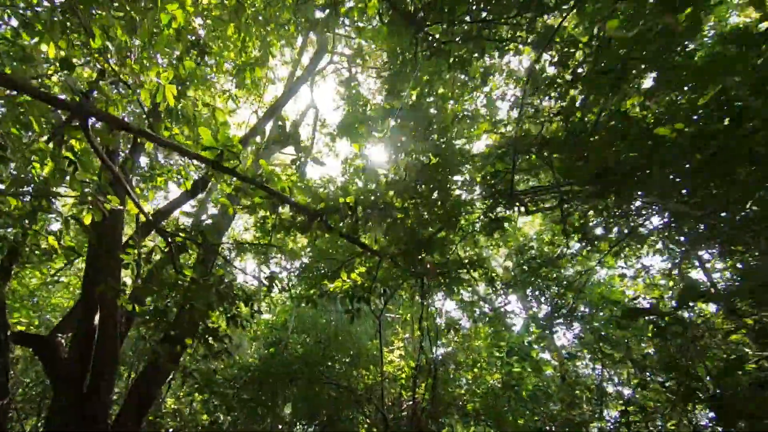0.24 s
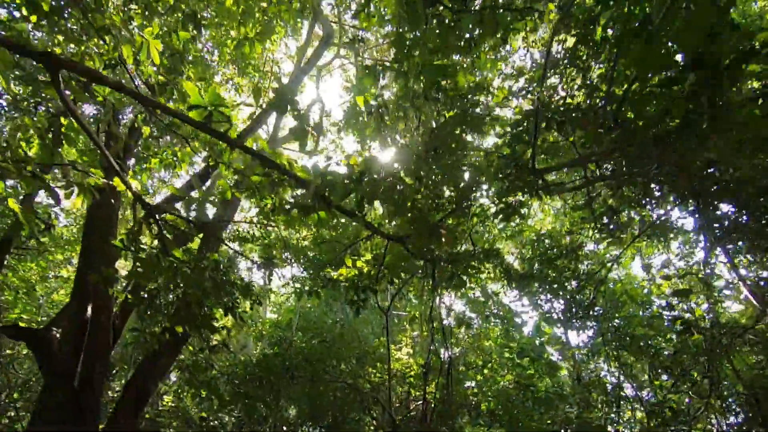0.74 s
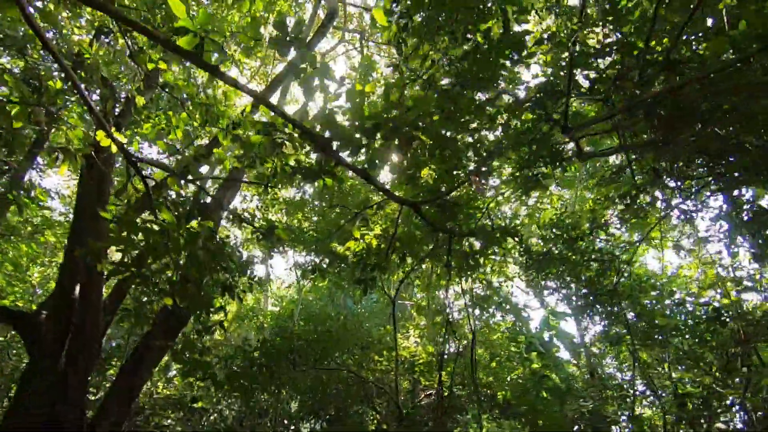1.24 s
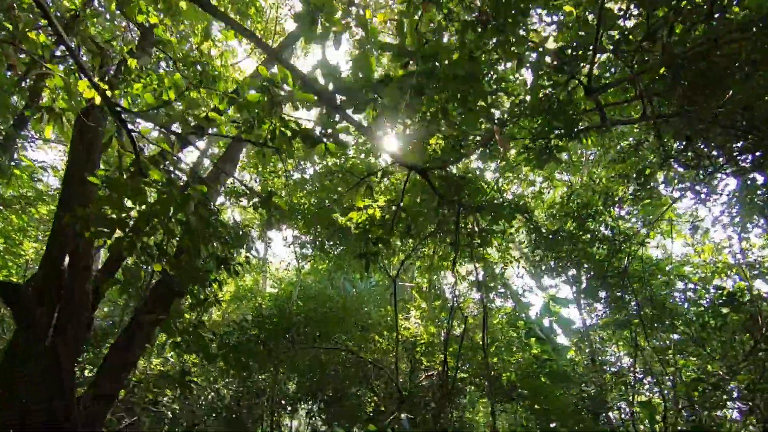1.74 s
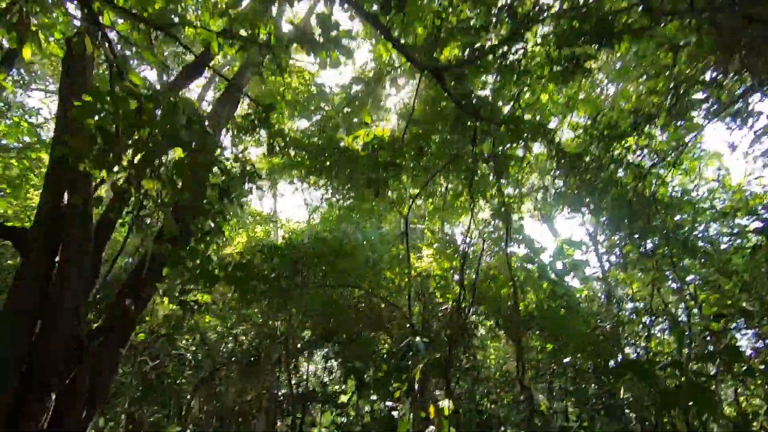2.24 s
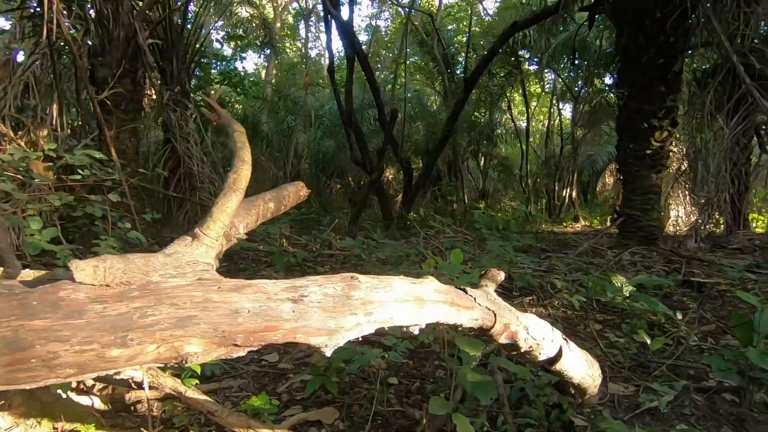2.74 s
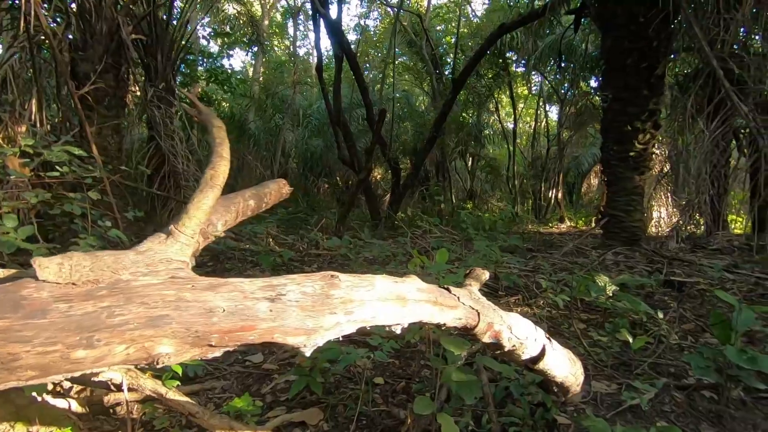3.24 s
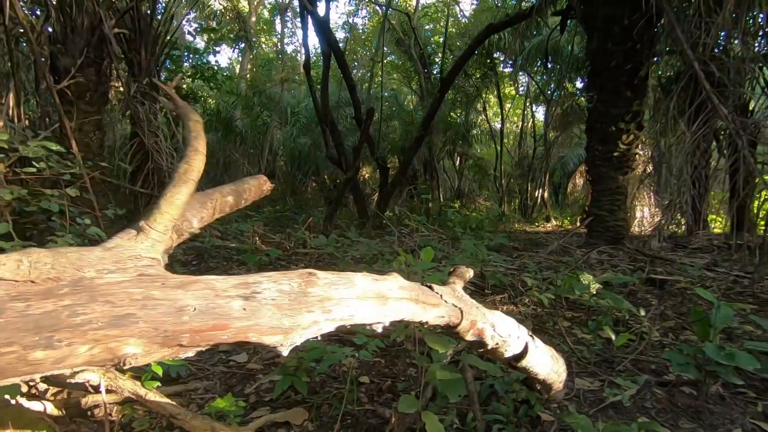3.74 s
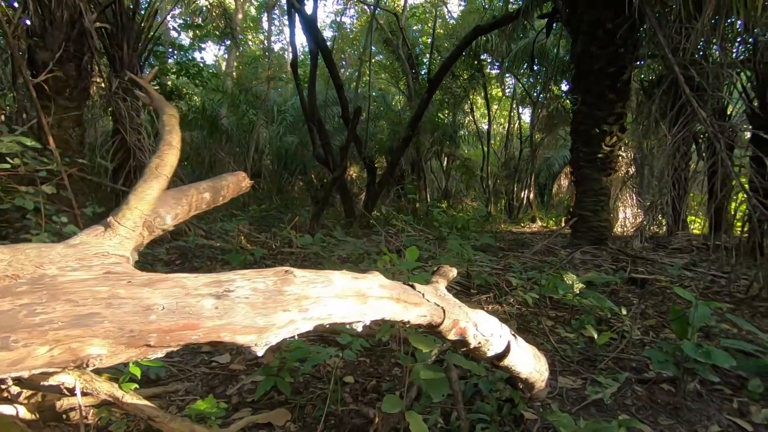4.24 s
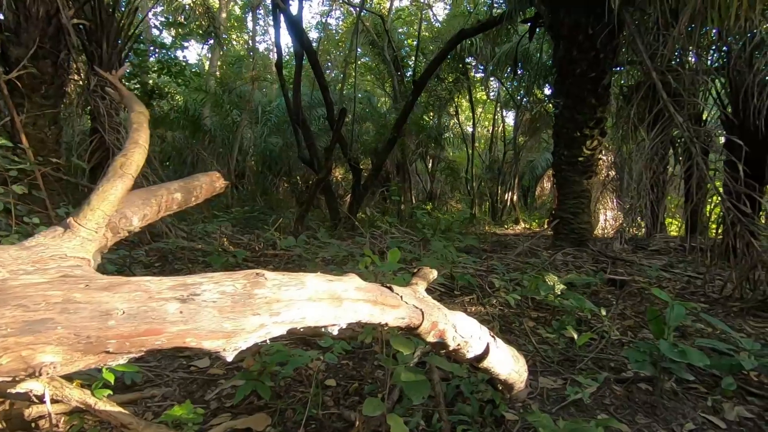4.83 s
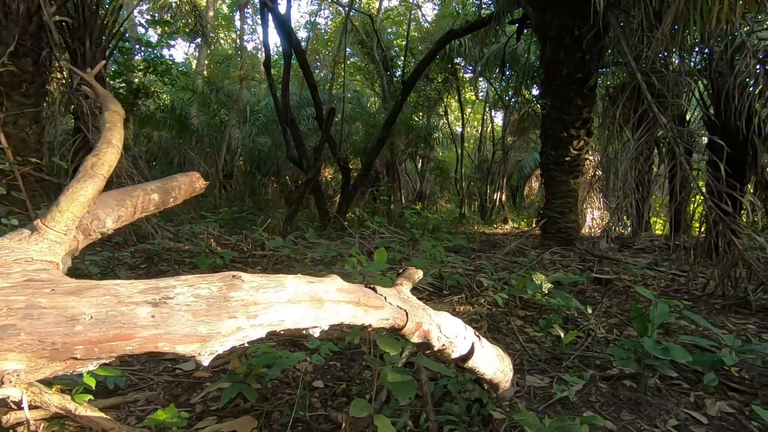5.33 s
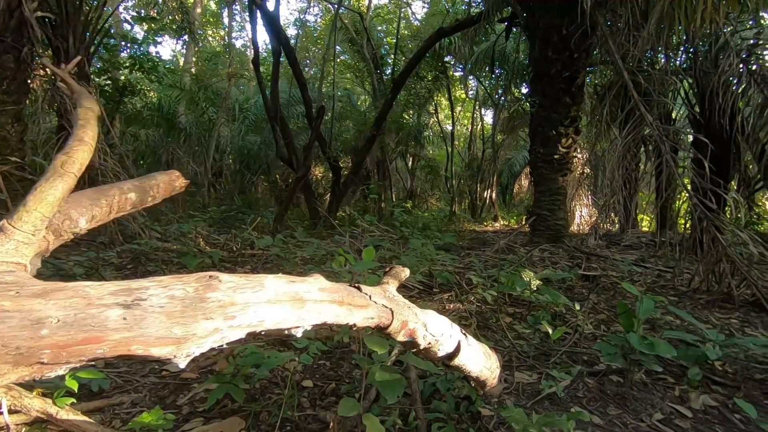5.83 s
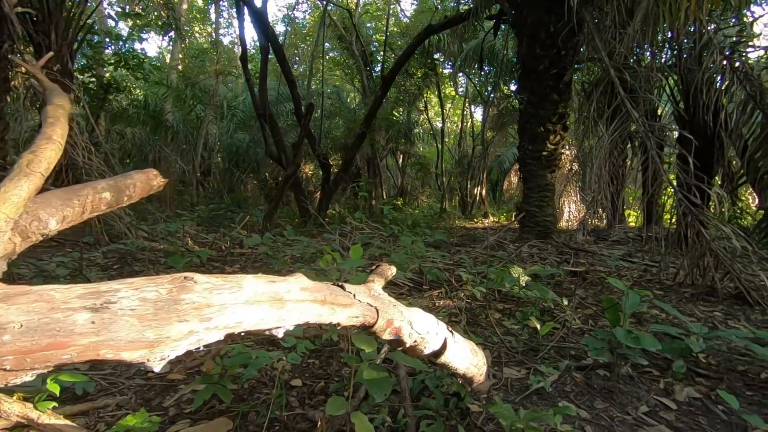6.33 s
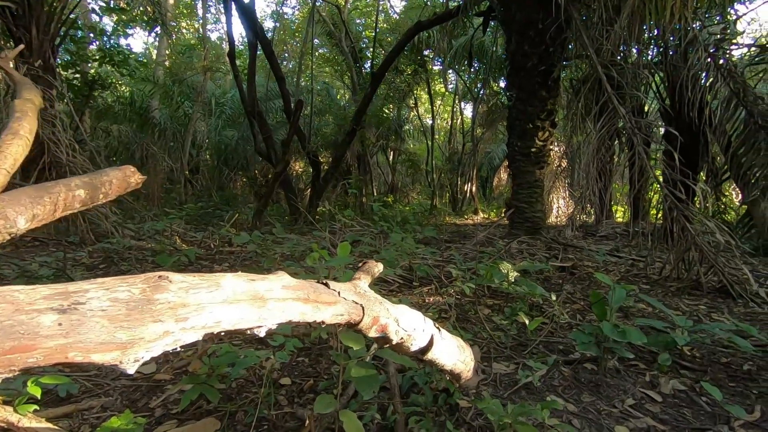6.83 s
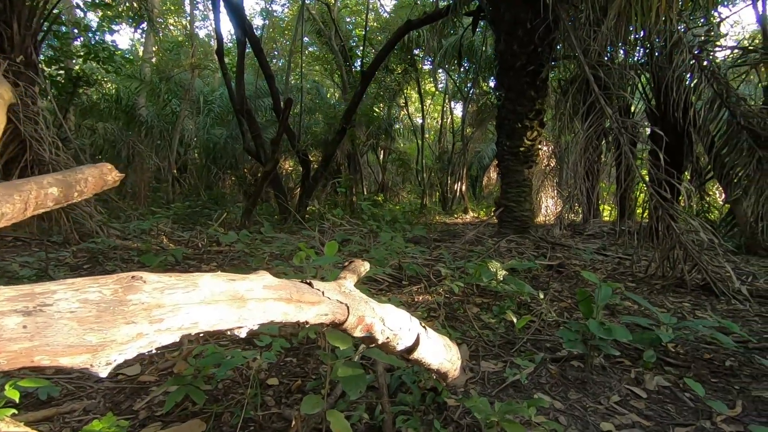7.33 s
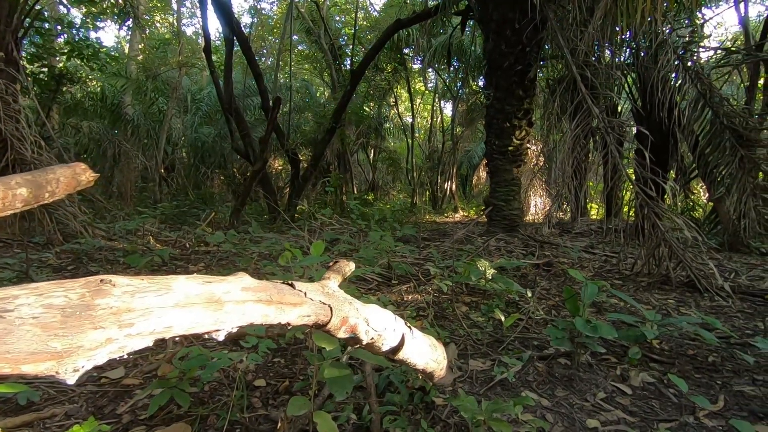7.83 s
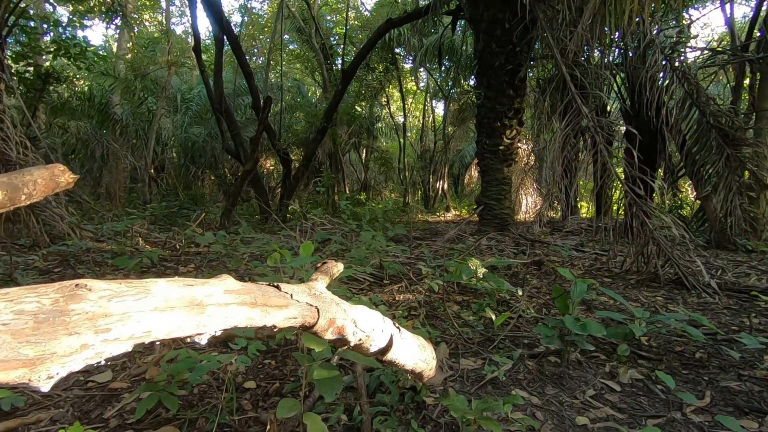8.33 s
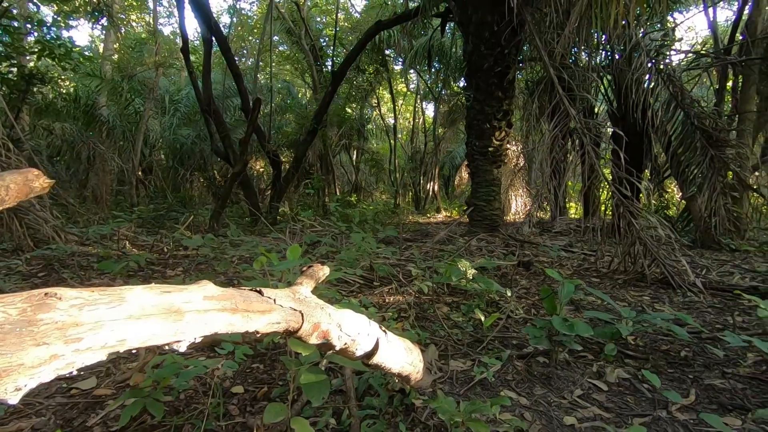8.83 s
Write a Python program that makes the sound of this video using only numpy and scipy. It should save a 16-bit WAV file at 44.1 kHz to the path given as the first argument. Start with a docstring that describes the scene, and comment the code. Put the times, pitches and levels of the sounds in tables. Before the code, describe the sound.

From 0 to 2.6 seconds, a dense, steady cicada hiss around 7 kHz sits over a soft leafy hush. Dry litter crunches gently close by, with twig snaps, the sharpest at 1.0 and another crack at 2.55. Slow far whistles glide upward at 0.85 and 1.45; a nasal, trembling bird call comes at 2.2 to 2.5. At 2.65 the place changes abruptly: footsteps cease, the cicadas are softer and slightly lower, and a rising bird call opens over a faint whir and a low flutter that dies away. It stays sparse, with a tiny twig tick at 4.1, very faint chirps near 4.5 to 4.9 and dim coos. A rising call at 5.85 leads to rapid, regular chatter from 6.4 to about 9. Whistles return from 7.1, a low coo at 8.0, falling phrases at 8.05 and 8.45, and a dull tap at 8.5. Echoes scatter widely among trunks.

```python
"""A tropical forest, heard at two spots: the first gives way abruptly to the second.
Shaped noise makes the leafy hush, and fused random clicks the cicada chorus that hisses over it. Birds whistle,
coo and chatter as gliding sines, most of them scattered among echoing trunks. At the first spot feet crunch on
dry litter as shaped grains; twigs snap as ringing cracks, one of them at the second spot.
There a faint whir and a dying flutter sound in opposite phase at the two ears; late on comes a dull tap."""
import sys
import numpy as np
from scipy import signal
from scipy.fft import rfft, irfft, next_fast_len
from scipy.io import wavfile

SR = 44100
rng = np.random.default_rng(int(sys.argv[2]) if len(sys.argv) > 2 else 0)


def store_wav(level_fs):
    """Save 16-bit WAV to argv[1]."""
    pcm = np.round(np.clip(np.atleast_2d(level_fs), -1, 1) * 32767)
    wavfile.write(sys.argv[1], SR, pcm.T.astype(np.int16))


N = 399987
T = np.arange(N) / SR   # time [s]
CUT_S = 2.645   # the second spot begins


def amp(db):
    """Logarithmic level: decibels become an amplitude gain."""
    return 10 ** (np.asarray(db) / 20)


def rms_one(x):
    """Energy normalization: scaled to rms 1."""
    return x / np.sqrt(np.mean(x ** 2) + 1e-30)


def lean(x, db):
    """Interaural level difference: db louder on the left."""
    return x * amp([[db / 2], [-db / 2]])


def coloured(x, spectrum):
    """Spectral shaping by (Hz, dB) points on a log frequency axis, silenced outside them; rms 1."""
    hz, db = np.transpose(spectrum)
    size = next_fast_len(N)
    log_f = np.log(np.fft.rfftfreq(size, 1 / SR) + 1)
    gain = amp(np.interp(log_f, np.log(hz), db, -90, -90))
    return rms_one(irfft(rfft(x, size) * gain, size)[..., :N])


def resonance(x, hz, width_hz):
    """Resonance: a pole pair rings at hz, with a gain of about 1 on top."""
    r = np.exp(-np.pi * width_hz / SR)
    feedback = [1, -2 * r * np.cos(2 * np.pi * hz / SR), r * r]
    return signal.lfilter([(1 - r * r) / 2, 0, (r * r - 1) / 2], feedback, x)


def drift(rate):
    """Random modulation: straight lines between chance values of spread 1, rate of them a second."""
    knots = rng.standard_normal(int(T[-1] * rate) + 2)
    return np.interp(T * rate, np.arange(len(knots)), knots)


def level(rows, column, fade_s=0.004):
    """Amplitude envelope: a gain along a table, faded to silence at both ends."""
    rows = np.array(rows)
    edge = np.clip(np.minimum(T - rows[0, 0], rows[-1, 0] - T) / fade_s, 0, 1)
    return edge * amp(np.interp(T, rows[:, 0], rows[:, column]))


def sing(rows, tremble_db, rate):
    """Harmonic synthesis of a syrinx: partials on one gliding pitch tremble apart, overtones twice as much."""
    times, pitches = np.array(rows)[:, :2].T
    phase = 2 * np.pi * np.cumsum(np.interp(T, times, pitches)) / SR
    voice = np.zeros(N)
    for k in range(1, len(rows[0]) - 1):   # one level column a partial
        tremble = amp(tremble_db * min(k, 2) * drift(rate))
        voice += level(rows, k + 1) * tremble * np.sin(k * phase)
    return np.sqrt(2) * voice


def notes(rows, glide, attack_s, release_s):
    """Frequency modulation: swelling sines; glide gives the share of the pitch change made so far."""
    out = np.zeros(N)
    for s, length, from_hz, to_hz, db, swell_db, *more in rows:
        t = T[:int(length * SR)]
        hz = from_hz + (to_hz - from_hz) * glide(t / length, *more)
        attack = np.minimum(t / attack_s, 1) ** 2
        release = np.minimum((length - t) / release_s, 1)
        gain = amp(db - swell_db * (1 - t / length)) * attack * release
        at = int(max(s, 0) * SR)
        out[at:at + len(t)] += np.sqrt(2) * gain * np.sin(2 * np.pi * np.cumsum(hz) / SR)
    return out


def bend(share):
    """Accelerating glide: the pitch moves as a power of time, slowly at first."""
    return share ** 1.4


def among_trunks(x, lean_db, direct_db, echo_db, alike, t60, bright=0, lag_s=0):
    """Multiple scattering: direct sound plus a dense exponential decay, partly shared by the ears.
    Leaves return more treble and their stirring makes the scatter flicker; lag_s delays the right ear's direct sound."""
    stir = (1 + .5 * drift(170)) / 1.1
    share, noise = np.clip(alike, 0, 1), rng.standard_normal((3, SR))
    scatter = np.sqrt(share) * noise[0] + np.sqrt(1 - share) * noise[1:]
    scatter *= amp(-60 * T[:SR] / t60) * (T[:SR] > .008)   # nothing returns in the first 8 ms
    scatter /= np.sqrt(np.sum(scatter ** 2) / 2)
    scatter = signal.lfilter([1, -bright], [1], scatter)
    direct = np.array([x, np.interp(T - lag_s, T, x)])
    echoes = stir * signal.fftconvolve(x[None], scatter, axes=1)[:, :N]
    return lean(amp(direct_db) * direct + amp(echo_db) * echoes, lean_db)


def hush(centre, centre_db, wide, wide_db, treble_db=0):
    """Sum and difference noise: air and leaves, shared and opposed at the ears; three bands swell apart."""
    mid = amp(centre_db) * coloured(rng.standard_normal(N), centre)
    side = amp(wide_db) * coloured(rng.standard_normal(N), wide)
    ears = np.array([mid + side, mid - side])
    bass = signal.sosfilt(signal.butter(1, 450, fs=SR, output="sos"), ears)
    below = signal.sosfilt(signal.butter(1, 1500, fs=SR, output="sos"), ears)
    swelling = bass * amp(1.35 * drift(5))
    swelling += (below - bass) * amp(1.7 * drift(4))
    return swelling + (ears - below) * amp(treble_db + 2.1 * drift(6))


# Spectra of the ears' sum and of their spread at the first spot: (frequency [Hz], relative level [dB])
FIRST_HUSH_CENTRE = [(20, -4), (60, -18.5), (118, -9.5), (199, 1), (274, -7), (567, -13.5), (745, -5),
                     (935, -12), (1260, -6), (1810, -14), (4600, -18)]
FIRST_HUSH_WIDE = [(20, -5), (103, -14), (170, -5.5), (554, -12.5), (854, -3), (1320, -10), (2990, -21.5),
                   (4600, -30)]


def first_hush():
    """Broadband noise: air and leaves at the first spot."""
    return hush(FIRST_HUSH_CENTRE, -69.5, FIRST_HUSH_WIDE, -69)


def cicadas(spectrum, db, lean_db, alike):
    """Temporal fusion: so many tymbal clicks that they hiss; the bodies and the air give the colour."""
    clicks = rng.standard_normal((3, N)) * (rng.random((3, N)) < 14000 / SR)   # 14000 a second
    share = np.clip(alike, 0, 1)
    ears = np.sqrt(share) * clicks[0] + np.sqrt(1 - share) * clicks[1:]
    return lean(coloured(ears, spectrum) * amp(db + 0.3 * drift(7.6)), lean_db)


# Chorus spectrum at the first spot: (frequency [Hz], relative level [dB])
FIRST_CHORUS = [(4300, -42), (5240, -31.5), (5640, -18.5), (6070, -18), (6550, -6), (7050, -0.5),
                (7410, -3), (7780, -12.5), (8300, -36), (10000, -40.5), (11300, -79), (15000, -75)]


def first_cicadas():
    """Fused clicks: the chorus at the first spot."""
    return cicadas(FIRST_CHORUS, db=-45, lean_db=-1.0, alike=0.066)


def step_up(share, centre):
    """Sigmoid glide: a steady creep over the whole note plus one smooth step."""
    creep, width = 0.26, 0.13   # shares of the climb and of the length
    return creep * share + (1 - creep) * (1 + np.tanh((share - centre) / width)) / 2


# Slow far whistles, low, then a glide up: (start [s], length [s], from [Hz], to [Hz],
# closing level before echo and scatter [dB], swell [dB], glide centre [share of length], relative echo [dB])
WHISTLES = [(0, 0.23, 1178, 1207, -68, 6, 0.76, -9), (0.843, 0.22, 1207, 1287, -48, 12.5, .35, -29),
            (1.448, 0.42, 1194, 1308, -57.5, 14.5, 0.51, -19),
            (7.133, 0.37, 1166, 1216, -56.5, 4, 0.54, -14), (7.957, .33, 1195, 1257, -61, 0.5, 0.397, -3),
            (8.392, 0.32, 1190, 1307, -60.5, 5, 0.64, -1.5)]
# Moments at which whistle and echo dip briefly in level: (time [s])
DIPS = [1.022, 1.554, 1.628, 1.708, 7.293, 7.395, 7.525, 7.55, 8.05, 8.525, 8.568]
DIP_WIDTH_S, DIP_DB = 0.009, -12
SLAP_S = .11   # echo delay off the far side of the clearing


def whistler():
    """Discrete echo: each gliding whistle comes back once, beating against itself; their level dips briefly."""
    dips = sum(np.exp(-((T - s) / DIP_WIDTH_S) ** 2) for s in DIPS)
    wavering = amp(DIP_DB * dips + 2.5 * drift(25))
    out = np.zeros(N)
    for *note, echo_db in WHISTLES:
        whistle = notes([note], step_up, attack_s=0.063, release_s=0.017)
        out += whistle + amp(echo_db) * np.interp(T - SLAP_S, T, whistle, 0)
    return wavering * out


# Colour of the leaves: (frequency [Hz], relative level [dB])
LEAF = [(200, -13.5), (600, -17), (1200, -2), (2000, 3), (4500, -5), (6500, -7.5), (10000, -13),
        (11500, -32), (15000, -27.5)]
# Weight on the litter, rise and fall spanning 20 dB:
# (crest [s], rise [s], fall [s], crest level before scatter [dB], brightness [dB])
STEPS = [(.22, 0.41, 0.31, -64, -3), (.41, 0.21, 0.032, -68, -4), (.85, 0.58, 0.97, -62, -12),
         (1.028, 0.062, 0.12, -59, 3), (1.111, 0.1, 0.061, -58.5, -2), (1.419, 0.11, 0.12, -57, -33),
         (2.22, 0.23, 0.12, -56, -6)]


def litter():
    """Granular noise: leaves crack as uneven grains; a brighter step lifts the treble."""
    happens = rng.random(N) < 900 / SR   # 900 grains a second
    uneven_db = 3.2 * drift(80) + 2.4 * np.minimum(rng.exponential(1, N), 5)
    leaf = coloured(happens * amp(uneven_db) * rng.choice([-1, 1], N), LEAF)
    dull = signal.sosfilt(signal.butter(4, 2700, fs=SR, output="sos"), leaf)
    out = np.zeros(N)
    for s, rise, fall, db, bright_db in STEPS:
        weight = amp(db - 20 * np.maximum((s - T) / rise, (T - s) / fall))
        out += weight * (dull + amp(bright_db) * (leaf - dull))
    return out


# Snaps: (time [s], peak level before the lean [dB], left minus right [dB], brightness [dB])
TWIGS = [(0.581, -47.5, -6, -30), (0.714, -44, -5.5, -2), (0.873, -49.5, -5, -9), (1.002, -47, -6.5, -6),
         (1.017, -34, -7.5, -6.5), (1.02, -44, 0, -5), (1.067, -50, -5, 4), (1.096, -50, -8, -14),
         (1.103, -53, -11, 3), (1.119, -50, -2.5, -6), (1.361, -60, -32, -25), (1.416, -57, -12, -24),
         (1.475, -66, -2, -29), (1.494, -49, -9, -28), (1.594, -57.5, -7, -20), (1.945, -59, -8, -8),
         (2.074, -51, -11, -15), (2.13, -49, -9, -13), (2.546, -38.5, 6, -1), (4.096, -58, -12, -13)]
# Modes of a twig: (frequency [Hz], width [Hz], relative level [dB])
TWIG_MODES = [(480, 680, 3), (1300, 800, 9), (2600, 1300, 7), (4000, 1200, 8), (9000, 4000, -8)]


def twigs():
    """Modal excitation: a crack of a few milliseconds rings short modes, newly weighted for each twig."""
    out, t = np.zeros((2, N)), T[:800]
    cracks = rng.standard_normal((len(TWIGS), 800)) * np.exp(-t / 0.0026)
    strengths = rng.normal(0, 2.4, (len(TWIGS), len(TWIG_MODES)))   # dB
    for (s, db, lean_db, bright_db), crack, own in zip(TWIGS, cracks, strengths):
        ring = np.zeros(len(t))
        for (hz, width_hz, mode_db), own_db in zip(TWIG_MODES, own):
            gain = amp(mode_db + own_db + bright_db * (hz > 2900))   # dry twigs ring higher
            ring += gain * resonance(resonance(crack, hz, width_hz), hz, 2 * width_hz)
        at = int(s * SR)
        out[:, at:at + 800] += lean(amp(db) * ring / np.abs(ring).max(), lean_db)
    return out


# Quick thin sweeps, played dry: (start [s], length [s], from [Hz], to [Hz], closing level [dB], swell [dB])
SWEEPS = [(2.168, 0.032, 2500, 2400, -66, 6), (8.022, 0.034, 5200, 3920, -75, -2),
          (8.108, 0.027, 3900, 5700, -73, 2), (.78, 0.042, 2360, 2056, -66.5, 7)]


def thin_sweeps():
    """Frequency sweeps: brief gliding sines, played dry."""
    return notes(SWEEPS, bend, attack_s=0.0032, release_s=.004)


# Dove coos: (start [s], length [s], from [Hz], to [Hz], closing level before scatter [dB], swell [dB])
COOS = [(2.03, 0.26, 514, 510, -78, -1), (2.47, 0.24, 494, 491, -69, 7), (2.6, 0.46, 456, 476.4, -90, -17),
        (3.66, 0.3, 447, 430, -90.5, -14), (5.55, 0.35, 460, 454, -82, -1),
        (5.85, 0.39, 444.3, 427, -77, 3.5), (6.3, 0.21, 438, 445, -80, -8),
        (8.0, .52, 467.5, 483, -64.5, 6), (6.66, 0.29, 452, 452, -84, -5)]


def coos():
    """Near-pure tones: low sines with soft edges and a wavering level."""
    return notes(COOS, bend, attack_s=0.096, release_s=0.15) * amp(2.0 * drift(18))


# Hoarse notes: three faint ones and the breathy onset of the nasal call:
# (start [s], length [s], from [Hz], to [Hz], closing level before roughening and scatter [dB], swell [dB])
HOARSE_NOTES = [(3.91, .1, 1370, 1320, -89, 0.1), (4.015, 0.14, 4150, 3250, -95.5, -1),
                (8.86, 0.1, 2516, 1510, -81, -3), (2.195, .03, 1700, 3400, -65, .1)]
# Starts of far falling chirps: (time [s])
FAR_CHIRP_STARTS = [4.428, 4.675, 4.912]
# Their shape: (length [s], from [Hz], to [Hz], closing level before scatter [dB], swell [dB])
FAR_CHIRP = (.062, 2500, 1830, -86, .1)


def hoarse_notes_and_chirps():
    """Amplitude modulation: fast random multiplication makes notes hoarse; the falling chirps stay clean."""
    hoarse = notes(HOARSE_NOTES, bend, attack_s=0.0048, release_s=0.0031) * drift(400)
    chirps = [(s, *FAR_CHIRP) for s in FAR_CHIRP_STARTS]
    return hoarse + notes(chirps, bend, attack_s=0.0081, release_s=0.009)


# A near nasal call: (time [s], pitch [Hz], level before partial weights and scatter [dB], brightness [dB])
NASAL = [(2.209, 1395, -59, -18), (2.227, 1377, -61, -18), (2.271, 1333, -62.5, 6), (2.31, 1161, -64, 0),
         (2.37, 1157, -65, 4), (2.419, 1270, -64, 2), (2.49, 1250, -68, 6), (2.544, 913, -65.5, -5)]
# Weights of its partials: (relative level [dB])
NASAL_PARTIALS = [-1.5, 0.6, -11, -17.5]


def nasal():
    """Harmonic timbre: four trembling partials; the upper two come and go with brightness."""
    partials = np.array(NASAL_PARTIALS)
    upper = np.arange(len(partials)) > 1
    rows = [(s, hz, *(db + partials + bright_db * upper)) for s, hz, db, bright_db in NASAL]
    return sing(rows, tremble_db=2.2, rate=160)


# Spectra of the ears' sum and of their spread at the second spot: (frequency [Hz], relative level [dB])
SECOND_HUSH_CENTRE = [(20, -10.5), (118, -13.5), (166, -2), (412, -14.5), (593, -12), (874, -8.5),
                      (1020, -15), (2380, -16.5), (4110, -24), (4600, -17)]
SECOND_HUSH_WIDE = [(20, -13.5), (118, -15), (155, -9), (432, -15.5), (621, -7.5), (854, -5), (1120, -13.5),
                    (2030, -18.5), (2850, -25.5), (4600, -37)]
# Course of the treble in this hush: (time [s], relative level [dB])
TREBLE = [(2.6, 6.5), (3.3, -4), (5.6, -1.5), (5.9, 4), (7, 3.5), (9.1, 1)]


def second_hush():
    """Broadband noise: air and leaves at the second spot, with treble that comes and goes."""
    treble_db = np.interp(T, *np.transpose(TREBLE))
    return hush(SECOND_HUSH_CENTRE, -75, SECOND_HUSH_WIDE, -71, treble_db)


# Chorus spectrum at the second spot: (frequency [Hz], relative level [dB])
SECOND_CHORUS = [(4300, -45), (4710, -29.5), (5150, -26), (5480, -12), (5670, -7), (6550, 2), (7350, -6),
                 (7650, -21), (8070, -34), (8440, -39), (10000, -41.5), (12700, -53), (15000, -62)]


def second_cicadas():
    """Fused clicks: the chorus at the second spot."""
    return cicadas(SECOND_CHORUS, db=-50, lean_db=-3.0, alike=0.18)


# Singers beside the second chorus: (frequency [Hz], width [Hz], level before wavering and lean [dB])
SINGERS = [(4800, 120, -79), (7780, 110, -75.5)]


def side_singers():
    """Narrow-band noise: resonances sharpen noise into wavering trills."""
    out = np.zeros((2, N))
    for hz, width_hz, db in SINGERS:
        noise = rng.standard_normal((2, N))
        trill = resonance(resonance(noise, hz, width_hz), hz, width_hz)
        out += amp(db + 2.0 * drift(5.6)) * rms_one(trill)
    return lean(out, -0.54)


# Rising calls, the second with an octave: (time [s], pitch [Hz], level of each partial before scatter [dB])
RISES = [
    [(2.645, 1676, -64.5), (2.86, 1824, -63.5), (2.893, 2020, -58)],
    [(5.845, 1325, -70, -92), (5.885, 1355, -64, -72), (5.93, 1405, -66, -68.5), (6.0, 1450, -64, -67),
     (6.12, 1660, -64.5, -95), (6.185, 1703, -67.5, -100), (6.225, 1940, -54, -100)],
]


def rises():
    """Harmonic glides: calls whose partials climb together."""
    return sum(sing(rows, tremble_db=1.7, rate=110) for rows in RISES)


WHIR_FROM_HZ, WHIR_TO_HZ, WHIR_SETTLES_S, WHIR_WAVER_HZ = 350, 620, 0.58, 16


def whir_and_flutter():
    """Phase opposition: a wavering whir climbs and settles, a low flutter dies away, opposed at the ears."""
    since = np.maximum(T - CUT_S, 0)
    hz = WHIR_TO_HZ + (WHIR_FROM_HZ - WHIR_TO_HZ) * np.exp(-since / WHIR_SETTLES_S)
    hz += WHIR_WAVER_HZ * drift(4.9)
    whir = amp(-85 + 6.1 * drift(12)) * np.sqrt(2) * np.sin(2 * np.pi * np.cumsum(hz) / SR)
    low = rms_one(resonance(resonance(rng.standard_normal(N), 165, 60), 165, 60))
    flutter = amp(-71) * np.exp(-(since / 0.83) ** 2) * low
    return (T > CUT_S) * (whir + flutter) * [[1], [-1]]


# Single slurs and pips:
# (start [s], length [s], from [Hz], to [Hz], closing level before scatter [dB], swell [dB])
SLURS = [(2.89, 0.047, 2710, 2580, -70, -10.5), (6.22, 0.027, 2530, 2240, -66, -3),
         (6.262, .035, 2380, 1374, -69.5, -8), (7.68, .04, 3200, 3070, -72, 9),
         (7.724, 0.14, 2322, 1544, -74.5, -10.5)]


def slurs():
    """Frequency glides: short sines bend in pitch."""
    return notes(SLURS, bend, attack_s=0.007, release_s=0.0051)


# Chirps in a syllable: (delay [s], start pitch [Hz], end pitch [Hz], relative level [dB]);
# chance then shifts pitch and level
SYLLABLE = [(0, 2495, 1700, 1.5), (.015, 1512, 1230, -1), (.027, 2300, 1950, -4.5)]
CHATTER_S, SETTLED_GAP_S = 6.4364, .096
SLOW_START_S, SETTLES_IN = .05, 1.2   # time lost at the start, over about so many syllables


def chatter(chirp_s=0.0155, count=27):
    """Linear chirps: each syllable is three short falling sweeps; the pace settles until even."""
    out, t, k = np.zeros(N), T[:int(chirp_s * SR)], np.arange(count)
    starts = CHATTER_S + SETTLED_GAP_S * k + SLOW_START_S * (1 - np.exp(-k / SETTLES_IN))
    chance = rng.standard_normal((count, 2, len(SYLLABLE)))   # no two chirps alike
    for s, (pitches, strengths) in zip(starts, chance):
        for (delay, start_hz, end_hz, chirp_db), pitch, own in zip(SYLLABLE, pitches, strengths):
            cycles = start_hz * t + (end_hz - start_hz) * t ** 2 / (2 * chirp_s)
            chirp = np.sin((1 + 0.035 * pitch) * 2 * np.pi * cycles)
            at = int((s + delay) * SR)
            out[at:at + len(t)] += amp(-67 + chirp_db + 1.3 * own) * np.hanning(len(t)) * chirp
    return out


# A falling phrase: (time after its start [s], pitch [Hz], level before the singing's own and scatter [dB])
FALL = [(0, 3840, -82), (.03, 3450, -67.5), (.06, 3135, -60), (.09, 2222, -62.5), (.165, 1950, -63.5),
        (.245, 1460, -69)]
# When it is sung: (start [s], added level [dB])
FALL_STARTS = [(8.055, 0.1), (8.432, 0.1)]


def falls():
    """Repetition: one falling phrase is sung twice, trembling anew."""
    return sum(sing(np.array(FALL) + [s, 0, db], tremble_db=2.5, rate=98) for s, db in FALL_STARTS)


def tap():
    """Impulse response: a dull tone swells and decays within milliseconds, weaker and opposed at the right."""
    after = np.maximum(T - 8.4915, 0)
    envelope = after / 0.00084 * np.exp(-after / 0.00061)
    return amp(-23) * np.sin(2 * np.pi * 656 * after) * envelope * [[1], [-.6]]


def scene():
    """Superposition: the two spots in turn, and what sings or cracks in front."""
    first = first_hush() + first_cicadas()
    first += among_trunks(nasal(), lean_db=-4.5, direct_db=1.2, echo_db=5, alike=0.38, t60=0.6, bright=0.68)
    first += among_trunks(litter(), lean_db=-4.5, direct_db=-0.7, echo_db=-1.0, alike=0.29, t60=0.51)
    second = second_hush() + second_cicadas() + side_singers()
    passage = np.clip((T - CUT_S) / 0.0049 + .5, 0, 1)   # about 5 ms
    out = first + passage * (second - first)
    out += among_trunks(whistler(), lean_db=3.0, direct_db=1.55, echo_db=-8.5, alike=0.1, t60=1.6,
                        lag_s=0.00014)
    phrases = slurs() + falls() + rises()
    out += among_trunks(phrases, lean_db=0.0, direct_db=-3.1, echo_db=10.5, alike=0.37, t60=0.67, bright=1.0)
    hoarse = hoarse_notes_and_chirps()
    out += among_trunks(hoarse, lean_db=-0.5, direct_db=7.5, echo_db=12, alike=0.75, t60=0.5)
    out += among_trunks(coos(), lean_db=-0.5, direct_db=-1.5, echo_db=-4.0, alike=0.8, t60=0.92)
    out += among_trunks(chatter(), lean_db=2.5, direct_db=-2.5, echo_db=2, alike=0.7, t60=0.28)
    return out + thin_sweeps() + twigs() + whir_and_flutter() + tap()


def record(dry):
    """Low-pass filtering: the top is cut, 70 dB down from 15.8 kHz upward."""
    return signal.sosfilt(signal.cheby2(12, 70, 15800, fs=SR, output="sos"), dry)


dry = scene()
out = record(dry)
store_wav(out)
```